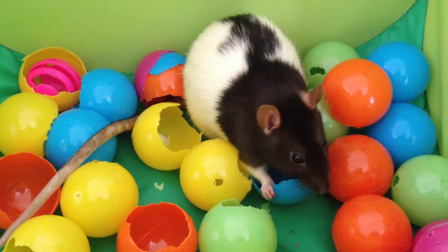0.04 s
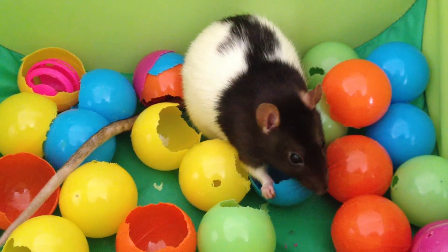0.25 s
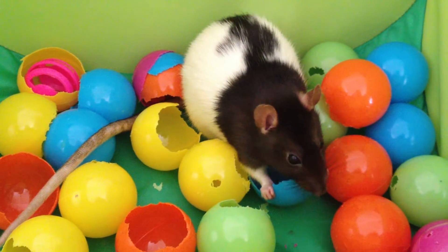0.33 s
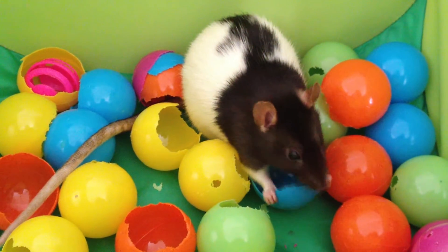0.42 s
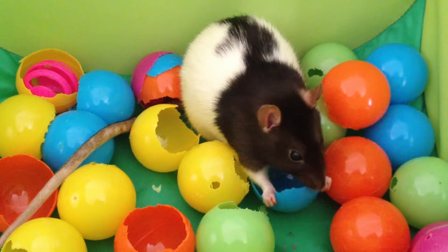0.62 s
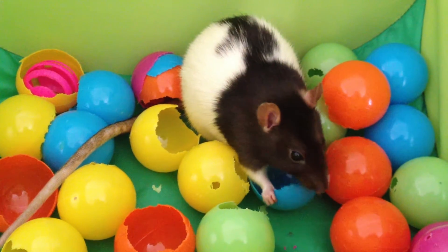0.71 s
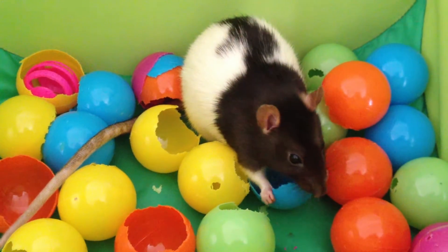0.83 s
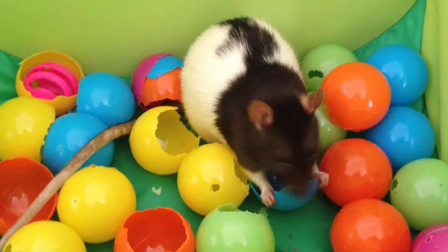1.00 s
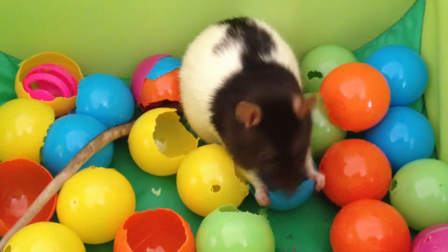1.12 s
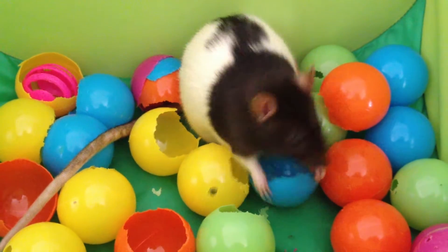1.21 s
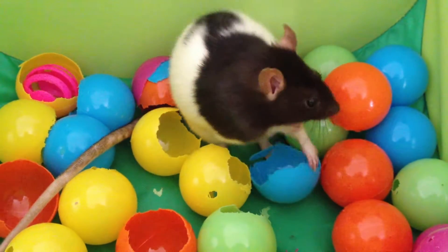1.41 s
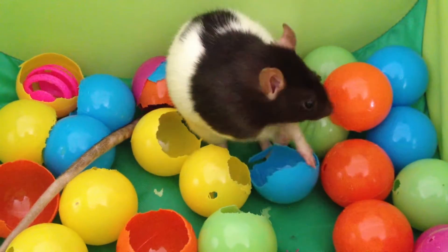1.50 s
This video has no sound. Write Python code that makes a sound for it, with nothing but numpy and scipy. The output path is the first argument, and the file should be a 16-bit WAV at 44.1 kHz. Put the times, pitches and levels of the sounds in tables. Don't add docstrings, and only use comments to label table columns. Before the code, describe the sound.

Close indoor pickup of thin plastic shells clacking as a small rodent paws them; a bright hard knock comes first, lesser clicks follow, then mostly quiet with tiny scratches, soft thuds and one small final click.

```python
import sys
import numpy as np
from scipy import signal
from scipy.fft import rfft, irfft
from scipy.io import wavfile
from scipy.ndimage import uniform_filter1d

SR = 44100
rng = np.random.default_rng(int(sys.argv[2]) if len(sys.argv) > 2 else 0)


def to_wav(sig):
    pcm = np.clip(np.atleast_2d(sig), -1, 1) * 32767
    pcm = np.round(pcm).astype(np.int16)
    wavfile.write(sys.argv[1], SR, pcm.T)


def elevation(decibels):
    levels = np.asarray(decibels, float)
    return 10 ** (levels / 20)


N = 68355


def add(out, start_s, x):
    i = int(start_s * SR)
    out[i:i + len(x)] += x[:len(out) - i]


def filtered(x, order, hz, kind):
    return signal.sosfilt(signal.butter(order, hz, kind, fs=SR, output="sos"), x)


def band(x, low_hz, high_hz):
    return filtered(x, 2, [low_hz, high_hz], "band")


def unit(x):
    return x / np.sqrt(np.mean(x ** 2))


def decay(t, t60_s):
    return 1000. ** (-t / t60_s)


def walk(rate_hz):
    hold = int(SR / rate_hz)
    steps = np.repeat(rng.standard_normal(N // hold + 1), hold)
    return unit(uniform_filter1d(uniform_filter1d(steps, hold), hold)[:N])


def shaped(spectrum):
    hz, db = np.array(spectrum, float).T
    bin_hz = np.arange(1, N // 2 + 2) * SR / N
    bin_db = np.interp(np.log(bin_hz), np.log(hz), db, left=-99, right=-99)
    return unit(irfft(rfft(rng.standard_normal(N)) * elevation(bin_db), N))


# freq [Hz], density [dB/Hz]
MURMUR_SPECTRUM = [(18, -95), (30, -69), (60, -12), (91, -21.5), (162, 0.5), (278, -3), (447, -5.5),
                   (706, -9.5), (1500, -9.5), (1950, -15), (3300, -120)]
# freq [Hz], density [dB/Hz]
HISS_SPECTRUM = [(880, -54), (1500, -36), (1800, -3.5), (2170, 0.5), (3200, -1.5), (6570, -0.5),
                 (10400, -10.5), (13800, -2), (15300, -4)]
# freq [Hz], level [dB rms]
HUM_LINES = [(120, -84), (731, -83.5)]
MURMUR_DB, MURMUR_FLICKER_DB = -72, .8
HISS_DB, HISS_DRIFT_DB = -71, .4
HUM_WAVER_DB = 2.5


def background():
    t = np.arange(N) / SR
    out = elevation(MURMUR_DB + MURMUR_FLICKER_DB * walk(25.8)) * shaped(MURMUR_SPECTRUM)
    out += elevation(HISS_DB + HISS_DRIFT_DB * walk(3.7)) * shaped(HISS_SPECTRUM)
    for hz, level_db in HUM_LINES:
        line = np.sqrt(2) * np.sin(2 * np.pi * hz * t)
        out += elevation(level_db + HUM_WAVER_DB * walk(12.97)) * line
    return out


# start [s], length [s], level [dB],
# centre [Hz]
SCRAPES = [(-0.03, 0.15, -66, 3760), (0.406, 0.05, -65.5, 4100), (0.994, 0.012, -63, 1800),
           (1.208, 0.048, -64.5, 4700), (1.255, 0.048, -61.5, 6200), (1.424, 0.015, -67, 5700),
           (0.23, 0.086, -58.5, 3200), (1.194, 0.12, -70.5, 4600), (.352, 0.043, -67, 2800),
           (1.54, 0.038, -66.5, 4400)]
GRAINS_PER_S, GRAIN_SPREAD_DB, SCRAPE_EDGE = 3600, 2, 0.65


def scrapes():
    out, t = np.zeros(N), np.arange(N) / SR
    for start_s, length_s, level_db, centre_hz in SCRAPES:
        chance, side, size = rng.random((N, 3)).T
        hit = chance < GRAINS_PER_S / SR
        grains = hit * np.sign(side - .5) * elevation(-GRAIN_SPREAD_DB * np.log(size + 1e-9))
        stroke = np.sin(np.pi * np.clip((t - start_s) / length_s, 0, 1)) ** SCRAPE_EDGE
        out += elevation(level_db) * stroke * unit(band(grains, centre_hz / 3.4, centre_hz * 1.4))
    return out


TILT_PIVOT_HZ, SCATTER_DB, DETUNE = 2200, 1, .004


def ring(modes, t, tilt_db=0.):
    hz, level_db, t60_s = np.array(modes, float).T[:, :, None]
    scatter, detune = rng.standard_normal((len(modes), 2)).T[:, :, None]
    since = np.maximum(t, 0)
    gain = elevation(level_db + tilt_db * np.log2(hz / TILT_PIVOT_HZ) + SCATTER_DB * scatter)
    tone = np.sin(2 * np.pi * hz * (1 + DETUNE * detune) * since)
    return np.sum(gain * tone * decay(since, t60_s), axis=0)


def swell(t, rise_s):
    return (1 - np.exp(-np.maximum(t, 0) / rise_s)) ** 2


# freq [Hz], level [dB], t60 [s]
AIR_MODES = [(626.6, -2, 0.021), (303, -14.5, 0.041)]
# freq [Hz], level [dB], t60 [s]
RIM_MODES = [(5680, -14, 0.013), (6280, -0.5, 0.0052), (6590, 1, 0.0056), (7010, -11.5, 0.01),
             (7920, -15, 0.014), (9050, -17, 0.01), (9380, -19.5, 0.014), (10320, -24, 0.013),
             (11020, -21.5, 0.0048), (12500, -42, 0.0071), (13300, -29, 0.0076), (14500, -32, 0.0076)]
AIR_DB, RIM_DB, STRIKE_DB = 7, 5, 2.5
PUSH_S, SNAP_S = .0004, .0003
CRACK_DB, CRACK_T60_S = -12, 0.0081


def strikes(events, shell_modes, rim_late_s):
    out, t = np.zeros(N), np.arange(SR // 16) / SR
    rim_t = t - rim_late_s
    for start_s, level_db, air_db, rim_db, tilt_db_per_oct in events:
        crack = band(rng.standard_normal(len(t)), 3500, 3600) * decay(t, CRACK_T60_S)
        shell = ring(shell_modes, t, tilt_db_per_oct)
        air = elevation(air_db + AIR_DB) * ring(AIR_MODES, t)
        rim = elevation(rim_db + RIM_DB) * (ring(RIM_MODES, rim_t) + elevation(CRACK_DB) * crack)
        hit = swell(t, PUSH_S) * (shell + air) + swell(rim_t, SNAP_S) * rim
        add(out, start_s, elevation(level_db + STRIKE_DB) * hit)
    return out


# start [s], level [dB], air re level [dB], rim re level [dB], shell tilt [dB/octave]
KNOCKS = [(.0414, -54, -12.5, -6.5, -12), (.0531, -50, -9.5, -9, -18.5), (.197, -57.5, -18, -3, 5.5),
          (.2303, -19.5, -33, 0, 2.5), (.2769, -36.5, -15.5, -28, -10), (.4200, -49, -15, -10, -15),
          (.4289, -45.5, -2, -9, -11), (.8196, -56, 2, -3, -17), (.9384, -50.5, -12, -5.5, -6),
          (.9925, -65, -5, 2, -15), (1.001, -54.5, -6.5, -4.5, -14), (1.281, -68.5, 5.5, -12, 1)]
# freq [Hz], level [dB], t60 [s]
SHELL_MODES = [(1020, -27, 0.004), (1350, -22, 0.03), (1563, -3.5, 0.012), (1830, -20.5, 0.0082),
               (2195, -3.5, 0.02), (2355, -6, 0.021), (2754, -13, 0.0074), (3133, -12.5, 0.017),
               (3480, -9, 0.013), (3996, -10, 0.012), (4750, -5.5, 0.0091)]


def knocks():
    return strikes(KNOCKS, SHELL_MODES, rim_late_s=.0008)


# start [s], level [dB], pitch [Hz]
THUDS = [(0.429, -52, 204), (.54, -50, 220), (0.627, -46.5, 200), (1.022, -55, 175), (1.286, -49, 268),
         (1.303, -49.5, 198), (1.455, -46, 345), (.235, -47.5, 260), (0.589, -50, 102)]
THUD_T60_S, THUD_RISE_S = 0.036, 0.0054


def thuds():
    out, t = np.zeros(N), np.arange(SR // 8) / SR
    envelope = decay(t, THUD_T60_S) * (1 - np.exp(-t / THUD_RISE_S))
    for start_s, level_db, pitch_hz in THUDS:
        add(out, start_s, elevation(level_db) * np.sin(2 * np.pi * pitch_hz * t) * envelope)
    return out


# start [s], level [dB], air re level [dB], rim re level [dB], shell tilt [dB/octave]
TICKS = [(.3458, -33.5, -36, -6, -1.5), (.3502, -42, -42, -24, -6), (.3655, -60, -35, -19, -3),
         (.4874, -68, -22, -20, 15), (1.1715, -55.5, -10, -8, 8.5), (1.428, -73, -22, 0, 12)]
# freq [Hz], level [dB], t60 [s]
STIFF_MODES = [(1650, -29, 0.006), (2150, -9.5, 0.0088), (2335, 1.5, 0.011), (2580, -5, 0.01),
               (3350, -4, .01), (3820, -13, 0.016), (4280, -16, 0.017)]


def ticks():
    return strikes(TICKS, STIFF_MODES, rim_late_s=.0002)


# start [s], level [dB], air re level [dB], rim re level [dB], shell tilt [dB/octave]
DROPS = [(1.4505, -58, -20, -20, -3), (1.4553, -39, -25.5, -4, 2.5), (1.4592, -55.5, -12, 3, 11)]
# freq [Hz], level [dB], t60 [s]
SPLIT_MODES = [(1290, -9, 0.019), (1787, 0.5, 0.013), (2230, -2, 0.016), (3180, -6.5, 0.01),
               (3750, -5.5, 0.013), (4160, -10, 0.012)]


def drops():
    return strikes(DROPS, SPLIT_MODES, rim_late_s=.0002)


# lag [s], level [dB]
ECHOES = [(.0025, -41.5), (.0048, -15.5), (.0085, -19), (.012, -25.5), (0.016, -20), (0.0232, -36)]
ECHO_TOP_HZ = 7250
ROOM_DB, ROOM_RISE_S, ROOM_T60_S, ROOM_TREBLE_T60_S = -19.5, .012, 0.2, 0.15


def room(x):
    t = np.arange(SR // 2) / SR
    low = band(rng.standard_normal(len(t)), 430, 3000) * decay(t, ROOM_T60_S)
    high = band(rng.standard_normal(len(t)), 6000, 15600) * decay(t, ROOM_TREBLE_T60_S)
    tail = (low + high) * (1 - np.exp(-t / ROOM_RISE_S))
    tail /= np.sqrt(np.sum(tail ** 2))
    taps = np.zeros(len(t))
    for lag_s, level_db in ECHOES:
        add(taps, lag_s, elevation([level_db]))
    response = filtered(taps, 1, ECHO_TOP_HZ, "low") + elevation(ROOM_DB) * tail
    return x + signal.fftconvolve(x, response)[:N]


def scene():
    floor = background()
    in_pen = scrapes() + knocks() + ticks() + drops()
    near = filtered(room(in_pen) + thuds(), 4, 114, "high")
    return (near + floor)[None]


def low_pass(x):
    return signal.sosfilt(signal.butter(12, 15460, fs=SR, output="sos"), x)


def record(dry):
    top_cut = signal.ellip(10, .2, 60, 15480, fs=SR, output="sos")
    mix = signal.sosfilt(top_cut, dry)
    return low_pass(mix)


dry = scene()
out = record(dry)
to_wav(out)
```